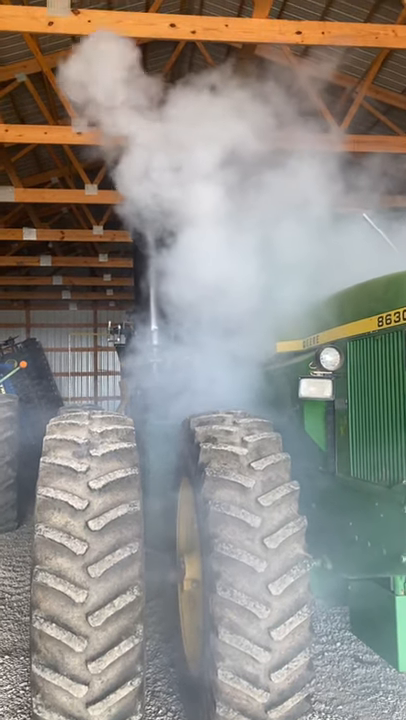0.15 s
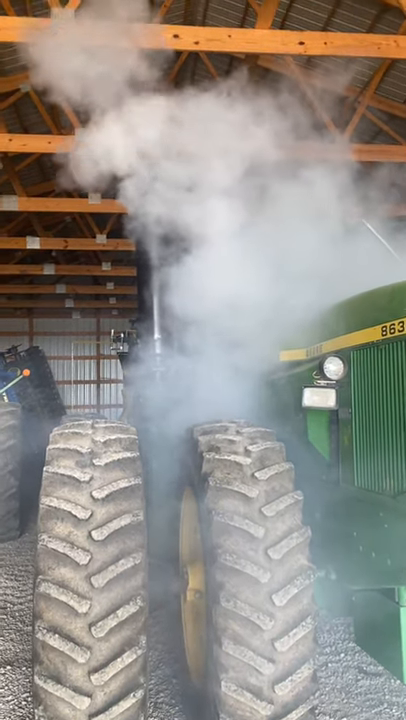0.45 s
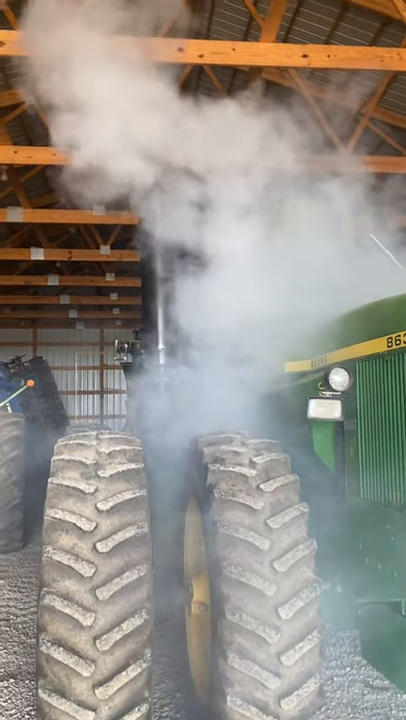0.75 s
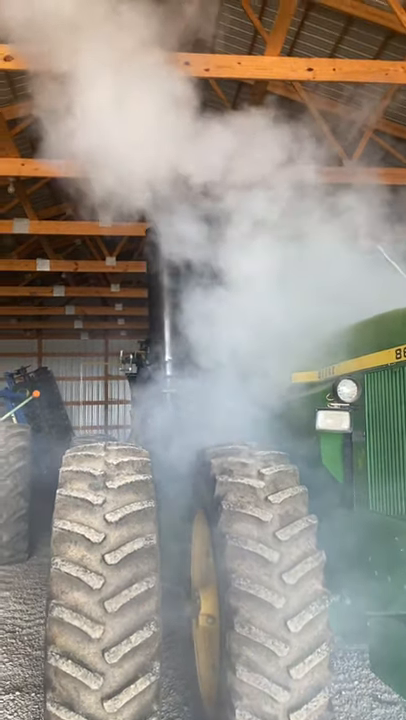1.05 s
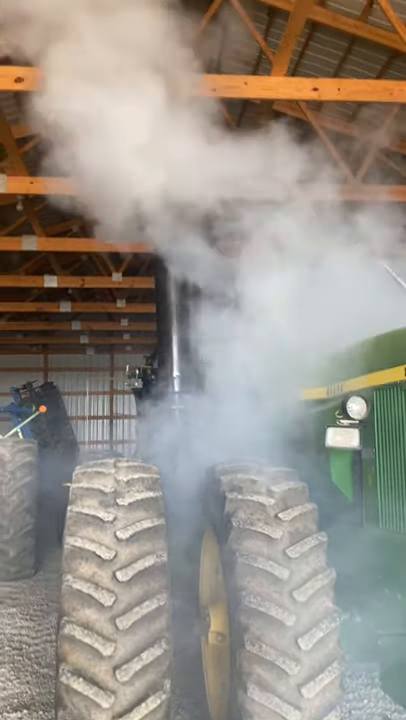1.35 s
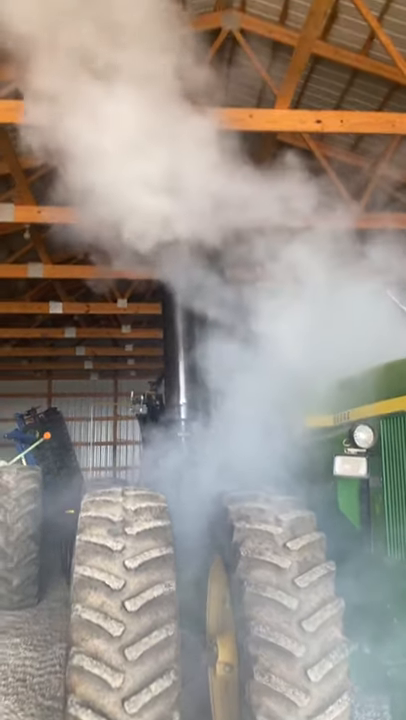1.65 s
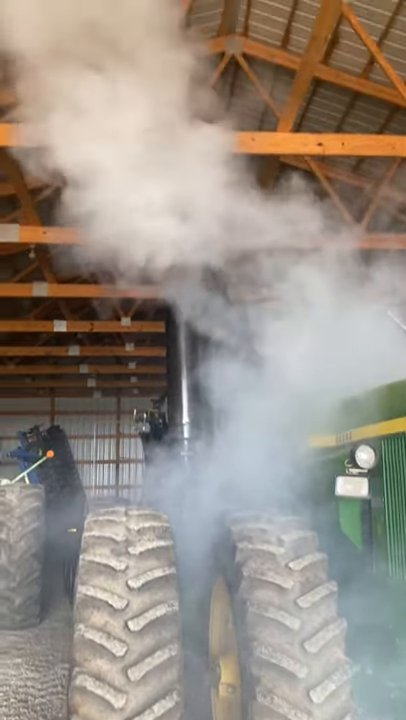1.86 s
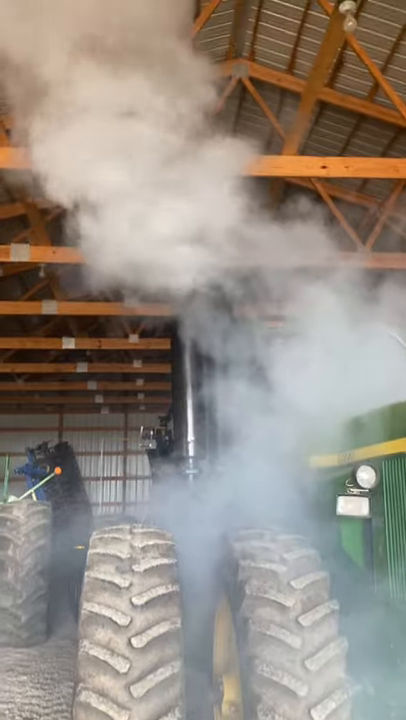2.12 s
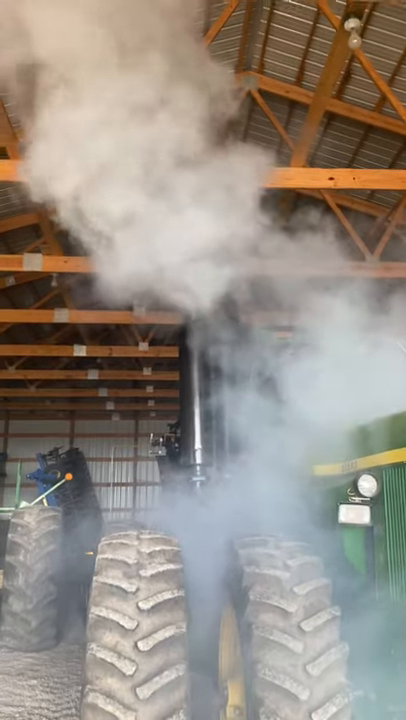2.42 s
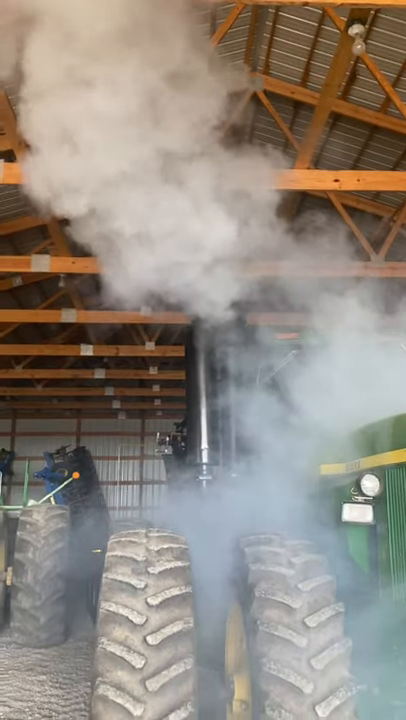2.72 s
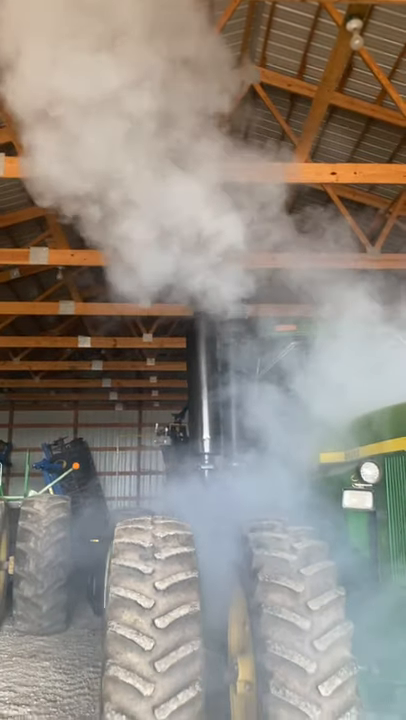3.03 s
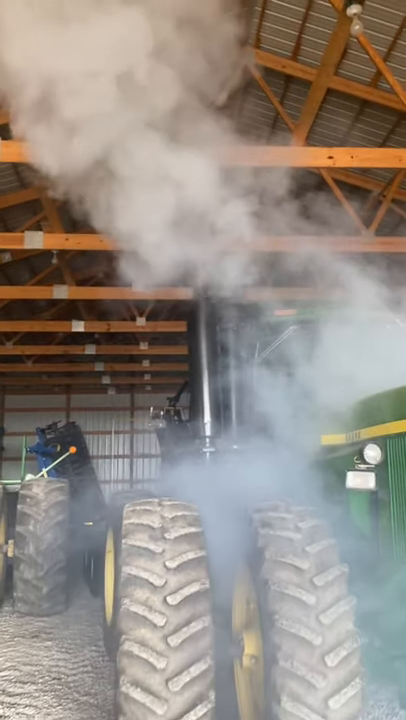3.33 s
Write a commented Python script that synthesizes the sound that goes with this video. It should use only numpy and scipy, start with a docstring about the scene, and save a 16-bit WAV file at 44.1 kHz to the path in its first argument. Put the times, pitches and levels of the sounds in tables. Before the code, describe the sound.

Large diesel engine chugging unevenly with hard uneven knocks and low rumble inside a shed.

```python
"""Ragged diesel tractor in a shed

A cold six-cylinder engine runs unevenly and slowly gathers speed. Its stack booms, throbs and rumbles:
engine orders, short low pressure swings, and noise and puffs shaped by resonances at each firing.
About once a cycle a cylinder bangs, as enveloped noise and wavering tones; gritty noise spits between.
Resonant noise makes the clatter and the loose steel, and decaying noise makes the shed's answer.
Towards the end the banging weakens and the running grows deeper and smoother."""
import sys
import numpy as np
from scipy import signal
from scipy.fft import rfft, irfft, next_fast_len
from scipy.io import wavfile
from scipy.ndimage import uniform_filter1d, map_coordinates

SR = 44100
rng = np.random.default_rng(int(sys.argv[2]) if len(sys.argv) > 2 else 0)


def dump_mix(stems):
    """Bounce the given channels to the path in sys.argv[1] as a 16-bit WAV at rate SR."""
    frames = np.atleast_2d(stems).T  # one column per channel
    limited = np.clip(frames, -1, 1)  # hard clip at full scale
    pcm = np.round(limited * 32767).astype(np.int16)
    wavfile.write(sys.argv[1], SR, pcm)


N = 153468  # samples
CYLINDERS = 6  # each fires once per engine cycle
COMMON = np.array([[1], [0]])  # sends a signal to the mid channel only


# Level of the stack before trims: t/s, boom level/dB, rumble level/dB
STACK_LEVELS = [(0, -25, -19), (.3, -27, -22), (.9, -24.5, -21), (1.5, -27, -21), (1.7, -28.5, -25),
                (2.3, -26.5, -24.5), (2.55, -28.5, -26.5), (2.63, -19.5, -23), (2.85, -24, -23),
                (3.0, -22, -23), (3.2, -23, -26), (3.48, -24.5, -28.5)]
# Levels before trims: t/s, gas roar level/dB, clatter level/dB, hiss level/dB
ENGINE_LEVELS = [(0.0, -45, -29, -13.5), (0.13, -19, -20, -52), (0.37, -20, -27, -50),
                 (0.61, -24.5, -27.5, -58), (1.38, -22.5, -28.5, -58), (1.78, -24.5, -32, -46),
                 (2.5, -25.5, -30.5, -61), (2.81, -24, -26.5, -58), (2.98, -23.5, -31.5, -26.5),
                 (3.2, -25.5, -32, -41), (3.48, -27, -32.5, -33)]
# Spectrum of the churning rumble: f/Hz, level/dB
RUMBLE_SPECTRUM = [(20, -25), (35, -32), (70, -37), (95, -2.5), (130, 3.5), (175, 0), (222, -6.5),
                   (260, -1), (295, -3.5), (325, -2), (360, -12), (400, -4.5), (500, -11), (700, -16),
                   (1500, -56), (5000, -84)]
# Spectrum of the gas roar: f/Hz, level/dB
ROAR_SPECTRUM = [(250, -12), (480, -1), (620, 2), (800, 4), (1020, -2.5), (1200, -6.5), (1450, -6.5),
                 (1700, -10), (2100, -11.5), (3500, -31), (9000, -91)]
# Resonances of stack and muffler: f/Hz, width/Hz, relative level/dB
STACK_MODES = [(132, 9.2, 6), (224.6, 34, 5.5), (247, 32, 0.5), (331, 87, -2.5), (399.3, 13.3, 2.5),
               (581, 5.3, -0.5)]


def exhaust(turns):
    """Pulsed excitation of a resonant pipe: firings modulate rumble and roar, and push puffs of gas."""
    rumble_db = curves(STACK_LEVELS)[1]
    roar_db = curves(ENGINE_LEVELS)[0]
    pipe = steady(noise(RUMBLE_SPECTRUM) + amp(-10) * ringing(STACK_MODES, drift=.03), size=900)
    churn = unit(pipe * firings(turns, uneven_db=3.5, scatter_s=0.00062, rise_s=0.014, fall_s=0.011))
    puffing = resonate(puffs(turns, uneven_db=2, scatter_s=.0012), STACK_MODES)
    rumble = unit(churn + amp(-4.5) * puffing)
    roar_pulses = firings(turns, uneven_db=1.4, scatter_s=0.0017, rise_s=0.0036, fall_s=0.023)
    roar = unit(noise(ROAR_SPECTRUM) * roar_pulses)
    return shed(amp(rumble_db - 1.0) * rumble + amp(roar_db - 3.0) * roar, wet_db=-7.5)


# Engine orders of the boom: multiple of the cycle rate, mean relative level/dB
BOOM_ORDERS = [(4, -48), (5, -12), (6, -17), (7, -13), (8, -25), (9, -14), (10, -27)]


def boom(turns, unsteady_db, drift_rad):
    """Superposition of engine orders: harmonics of the cycle rate beat together in the stack."""
    lines = np.zeros(N)
    for order, db in BOOM_ORDERS:
        level = amp(db + unsteady_db * wobble(12.0))
        phase = 2 * np.pi * (order * turns + rng.random()) + drift_rad * wobble(7)
        lines += level * np.sin(phase)
    return amp(curves(STACK_LEVELS)[0] - 2.5) * unit(lines) * COMMON


# Late, hard firings before trims: t/s, bang level/dB, metallic clack level/dB, hold/s
BANGS = [(0.006, -19.5, -21, 0.025), (0.174, -18.5, -20, 0.023), (.311, -9, -37, 0.0041),
         (0.44, -16, -22.5, 0.014), (0.561, -13, -24, 0.013), (0.692, -19, -21, 0.007),
         (0.806, -14.5, -23.5, 0.011), (0.93, -13, -23, 0.0077), (1.044, -9.5, -24, 0.0076),
         (1.17, -25, -19, 0.0032), (1.282, -8.5, -21, 0.01), (1.399, -14.5, -23.5, 0.026),
         (1.511, -10, -21, 0.015), (1.641, -25.5, -22.5, 0.006), (1.744, -13, -24, 0.011),
         (1.853, -16, -28.5, 0.026), (1.971, -12.5, -24, 0.013), (2.09, -21, -25.5, 0.0052),
         (2.196, -16.5, -35, 0.016), (2.302, -15.5, -35, 0.024), (2.414, -10.5, -26, 0.011),
         (2.532, -24.5, -31, 0.0047), (2.631, -16, -28, 0.011), (2.726, -19.5, -45, 0.015),
         (2.754, -15.5, -44, 0.017), (2.807, -16, -35, 0.022), (2.892, -21.5, -30, 0.013),
         (3.004, -20, -44, 0.0035), (3.063, -33, -31, 0.0051)]
# Spectrum of the gas in a bang: f/Hz, level/dB
BANG_SPECTRUM = [(80, -24), (220, 2), (450, 2.5), (650, -2), (850, 6.5), (1020, 7), (1220, -7.5),
                 (1450, -5), (1850, -5), (2200, -23), (3200, -20), (6000, -28), (15000, -90)]
# Spectrum of the metallic clack: f/Hz, level/dB
CLACK_SPECTRUM = [(500, 11), (1200, -16), (1700, 7), (1900, 19), (2080, 9.5), (2300, 10), (2520, 12),
                  (2800, 8.5), (3040, 9.5), (3500, -5.5), (4300, 2.5), (6000, -15), (10000, -62),
                  (15000, -117)]
# Resonances that sing in a bang: f/Hz, width/Hz, mean relative level/dB
BARK_MODES = [(626.6, 25.8, -4), (795.4, 49, -0.5), (985, 40, -1), (1173, 70, -7), (1662, 100, -7),
              (2534, 50.4, -16)]
# Resonances of the engine block: f/Hz, width/Hz, relative level/dB
IRON_MODES = [(1742, 24, -7), (2144, 69, 1), (2473, 47, 7.5), (2960, 8.4, 5), (3096, 22, 3)]


def bangs():
    """Impulsive excitation: a late firing cracks, swells to a bark in the stack and clacks in the block."""
    s, bang_db, clack_db, hold_s = np.transpose(BANGS)
    gas = steady(noise(BANG_SPECTRUM) + amp(1) * singing(BARK_MODES), size=110)
    swell = bursts(s + 0.0017, bang_db - .8, rise_s=0.0063, fall_s=0.011, hold_s=hold_s)
    crack = bursts(s - .005, bang_db - 6.5, rise_s=.0007, fall_s=.004)
    iron = steady(noise(CLACK_SPECTRUM) + amp(-5.5) * ringing(IRON_MODES, drift=.02), size=200)
    clack = iron * bursts(s, clack_db - .5, rise_s=0.0076, fall_s=0.013, hold_s=hold_s)
    return shed(gas * np.hypot(swell, crack) + clack, wet_db=-10.5)


# Thuds that close hard firings, before the shed's answer: t/s, peak level/dB
THUDS = [(.193, -16), (0.255, -10), (.308, -6), (.463, -8), (.581, -8.5), (.692, -15.5), (0.824, -4),
         (1.062, -6.5), (1.3, -6.5), (1.534, -9), (1.764, -9), (2.216, -10.5), (2.435, -11), (2.651, -13),
         (2.833, -10.5)]
# Deep throbs of the stack, before the trim: t/s, peak level/dB, f/Hz
THROBS = [(0.17, -19.8, 53), (0.311, -19.8, 53), (0.391, -20.5, 56), (0.525, -22.4, 54), (0.647, -19.2, 53),
          (0.756, -17.2, 60), (0.884, -18.6, 53), (0.999, -21.9, 52), (1.122, -18.2, 54),
          (1.242, -16.8, 60), (1.358, -18.0, 57), (1.484, -20.9, 60), (1.592, -21.2, 57),
          (1.715, -21.7, 57), (1.827, -20.4, 59), (1.933, -23.3, 55), (2.051, -21.3, 59),
          (2.163, -21.1, 57), (2.276, -20.4, 57), (2.378, -21.9, 54), (2.551, -20.1, 58),
          (2.631, -15.3, 57), (2.796, -14.7, 65), (2.902, -15.3, 65), (3.065, -17.4, 59),
          (3.193, -18.4, 63), (3.276, -21.7, 56), (3.382, -19.7, 65)]


def thumps():
    """Gaussian-windowed pressure swings: thuds close hard bangs, and throbs come about once a cycle."""
    thuds = pushes(*np.transpose(THUDS), 229, half_s=0.0033)
    throbs = pushes(*np.transpose(THROBS), half_s=.033)
    return shed(thuds, wet_db=-3.5) + amp(-2.5) * throbs


# Spits of gas before the trim: t/s, level/dB
SPITS = [(0.088, -33.5), (0.241, -37), (0.363, -40.5), (0.487, -39), (0.613, -40), (0.735, -34.5),
         (0.858, -36.5), (0.974, -35.5), (1.094, -38.5), (1.213, -32.5), (1.333, -34.5), (1.449, -34),
         (1.569, -40.5), (1.681, -34), (1.796, -37), (1.908, -36.5), (1.966, -50), (2.021, -38),
         (2.132, -33), (2.245, -36), (2.352, -35.5), (2.413, -52), (2.465, -36.5), (2.576, -31.5),
         (2.612, -33), (2.675, -35), (2.767, -32.5), (2.852, -35.5), (2.882, -34), (2.934, -39.5),
         (3.039, -38.5), (3.194, -40)]
# Spectrum of escaping gas: f/Hz, level/dB
SPIT_SPECTRUM = [(1500, 4), (3500, 5), (4600, 8), (5700, 7.5), (6700, 5), (7300, -5.5), (8800, 3),
                 (10700, -7), (12000, 0), (13500, -4), (14500, -37), (15500, -38)]
# Resonances of thin metal: f/Hz, width/Hz, relative level/dB
TIN_MODES = [(4740, 120, -5), (5660, 250, -9), (10400, 500, 15)]


def spits():
    """Turbulent jet noise: short gritty escapes of gas ring thin metal and linger under the roof."""
    s, db = np.transpose(SPITS)
    impacts = ticks(per_s=970, spread_db=1)
    grit = unit(filtered(impacts, lambda hz: amp(along(SPIT_SPECTRUM, hz))))
    gas = unit(noise(SPIT_SPECTRUM) + amp(-4) * grit + amp(-10) * ringing(TIN_MODES, drift=0.045))
    envelope = bursts(s, db + 6.5, rise_s=0.0058, fall_s=0.018, hold_s=0.0085)
    return shed(gas * envelope, wet_db=-6.5)


# Spectrum of the diesel clatter: f/Hz, level/dB
CLATTER_SPECTRUM = [(700, 0.5), (1600, -16), (2080, 4.5), (2270, 1.5), (2520, 8.5), (2800, 4), (3060, 6),
                    (3500, 2), (4300, -2.5), (5500, -8.5), (7000, -26), (9000, -42), (12000, -50),
                    (15000, -70)]
# Resonances of small rattling parts: f/Hz, width/Hz, relative level/dB
RATTLE_MODES = [(1370, 130, -1), (1870, 92, 4), (2170, 63, 8.5), (2950, 100, -8), (4330, 130, -14)]
# Resonances of loose steel: f/Hz, width/Hz, relative level/dB
STEEL_MODES = [(4300, 200, 3.5), (4720, 320, -8), (5400, 410, -13)]


def block(turns):
    """Modal response to firing: clatter rings iron and loose steel, among small rattles and a thin hiss."""
    _, clatter_db, hiss_db = curves(ENGINE_LEVELS)
    metal = noise(CLATTER_SPECTRUM) + amp(-13) * ringing(IRON_MODES, drift=.006)
    metal = metal + amp(-14.5) * ringing(STEEL_MODES)
    clatter = unit(metal * firings(turns, uneven_db=2.3, scatter_s=0.0013, rise_s=0.0087, fall_s=0.019))
    rattle = resonate(ticks(per_s=110, spread_db=4), RATTLE_MODES)
    mechanical = amp(clatter_db - 8.0) * (clatter + amp(-7) * rattle)
    hiss = amp(hiss_db - 13.0) * noise(SPIT_SPECTRUM)
    return shed(mechanical + hiss, wet_db=-5.5)


# Buzzes of the loose steel before the trim: t/s, level/dB
STEEL_BUZZES = [(1.966, -23), (2.190, -31.5), (2.306, -32), (2.412, -28.5), (2.615, -27), (2.735, -38),
                (2.888, -27)]


def loose_steel():
    """Forced modal vibration: a loose part, shaken by the engine, buzzes briefly at its resonances."""
    s, db = np.transpose(STEEL_BUZZES)
    buzz = ringing(STEEL_MODES) * bursts(s, db - 0.5, rise_s=0.0034, fall_s=0.027, hold_s=0.0022)
    return shed(buzz, wet_db=-13)


# Reverberation time of the shed: f/Hz, t60/s
SHED_T60 = [(100, 0.69), (1000, 0.67), (5000, 0.69), (12000, 0.36)]


def shed(x, wet_db):
    """Diffuse reverberation: noise builds up and decays at each frequency's own t60."""
    hz, t, z = signal.stft(rng.standard_normal((2, SR // 2)), SR, nperseg=256)
    decay = amp(-60 * t / along(SHED_T60, hz)[:, None])
    build_up = 1 - np.exp(-t / 0.029)
    tail = signal.istft(z * decay * build_up, SR, nperseg=256)[1]
    tail = tail / np.linalg.norm(tail[0])
    return x + amp(wet_db) * signal.fftconvolve(x, tail, axes=1)[:, :N]


def firing_samples(turns):
    """Equal phase spacing: sample indices at which the cycle passes each cylinder's firing point."""
    return np.flatnonzero(np.diff(np.floor(turns * CYLINDERS)))


def firings(turns, uneven_db, scatter_s, rise_s, fall_s):
    """Amplitude modulation: one burst per firing, each of its own size and a little early or late."""
    times = firing_samples(turns) / SR
    chance = rng.standard_normal((len(times), 2))
    return unit(bursts(times + scatter_s * chance[:, 0], uneven_db * chance[:, 1], rise_s, fall_s))


def puffs(turns, uneven_db, scatter_s):
    """Volume-flow pulses: one impulse per firing, softened by a third-order low-pass at 900 Hz."""
    i = firing_samples(turns)
    chance = rng.standard_normal((len(i), 2))
    at = np.clip(i + scatter_s * SR * chance[:, 0], 0, N - 1).astype(int)
    push = np.bincount(at, amp(uneven_db * chance[:, 1]), N)
    return filtered(push, lambda hz: 1 / (1 + 1j * hz / 900) ** 3) * COMMON


def pushes(times, levels_db, pitches_hz, half_s):
    """Gaussian tone bursts: low pressure swings centred on their times, 1/e half-width half_s."""
    out = np.zeros(N)
    for s, db, hz in np.broadcast(times, levels_db, pitches_hz):
        i = np.arange(max(0, int((s - 3 * half_s) * SR)), min(N, int((s + 3 * half_s) * SR)))
        t = i / SR - s
        out[i] -= amp(db) * np.exp(-(t / half_s) ** 2) * np.cos(2 * np.pi * hz * t)
    return out * COMMON


def bursts(times, levels_db, rise_s, fall_s, hold_s=0):
    """Incoherent power addition: bursts with a Gaussian rise, a hold and an exponential fall."""
    power = np.zeros(N)
    for s, db, hold in np.broadcast(times, levels_db, hold_s):
        first = max(0, int((s - 4 * rise_s) * SR))
        i = np.arange(first, min(N, int((s + hold + 8 * fall_s) * SR)))
        t = i / SR - s
        exponent = np.where(t < 0, -(t / rise_s) ** 2, -np.maximum(t - hold, 0) / fall_s)
        power[i] += (amp(db) * np.exp(exponent)) ** 2
    return np.sqrt(power)


def ticks(per_s, spread_db):
    """Poisson-like impacts: shared random times and sizes, with a separate random sign per channel."""
    hits = (rng.random(N) < per_s / SR) * amp(spread_db * rng.uniform(-1, 1, N))
    return hits * np.sign(rng.standard_normal((2, N)))


def resonate(x, modes):
    """Modal superposition: x through parallel second-order resonances, at rms 1."""
    def response(f):
        return sum(amp(db) * 1j * f * width / (centre * centre - f * f + 1j * f * width)
                   for centre, width, db in modes)
    return unit(filtered(x, response))


def ringing(modes, drift=0):
    """Noise-driven resonance: two unrelated noises whose pitch drifts by about this fraction, rms 1."""
    x = resonate(rng.standard_normal((2, N)), modes)
    i = np.arange(N)
    warped = (i + np.cumsum(drift * wobble(9))) % N  # varying the reading speed bends the pitch
    return unit(np.array([np.interp(warped, i, channel) for channel in x]))


def singing(modes):
    """Frequency-modulated resonance: strong tones waver within their width and shift together, rms 1."""
    shift = 1 + .035 * wobble(9)  # knots come at about the cycle rate

    def tone(hz, width):
        pitch = hz * shift + width * wobble(110)
        return np.sin(2 * np.pi * (np.cumsum(pitch) / SR + rng.random()))

    def voice():
        return sum(amp(db + 2.5 * wobble(9)) * tone(hz, width) for hz, width, db in modes)
    return unit(np.array([voice() for channel in range(2)]))


def steady(x, size):
    """Envelope normalisation: evens out the swells of a noise over size samples."""
    power = uniform_filter1d(uniform_filter1d(x ** 2, size), size)
    return x / np.sqrt(np.abs(power) + 1e-9)


def noise(spectrum):
    """Spectral shaping: two unrelated noises of rms 1 with this spectrum."""
    return unit(filtered(rng.standard_normal((2, N)), lambda hz: amp(along(spectrum, hz))))


def filtered(x, response):
    """Linear filtering: multiplies the spectrum of x by a response of frequency."""
    m = next_fast_len(N + SR // 2)
    return irfft(rfft(x, m) * response(np.fft.rfftfreq(m, 1 / SR)), m)[..., :N]


def wobble(rate):
    """Band-limited fluctuation: a smooth random curve, rate knots a second."""
    return map_coordinates(rng.standard_normal(int(N * rate / SR) + 4), [np.arange(N) * rate / SR])


def curves(rows):
    """Linear interpolation in time: one value per sample for each column after t/s."""
    s, *cols = np.transpose(rows)
    return [np.interp(np.arange(N) / SR, s, c) for c in cols]


def along(points, hz):
    """Logarithmic frequency scale: interpolates (f/Hz, value) points."""
    f, v = np.transpose(points)
    return np.interp(np.log(hz + 1), np.log(f + 1), v)


def amp(db):
    """Level law: decibels to amplitude gain."""
    return 10 ** (np.asarray(db) / 20)


def unit(x):
    """Power normalisation: scales to rms 1."""
    return x / np.sqrt(np.mean(x ** 2) + 1e-20)


# Speed of the engine: t/s, cycle rate f/Hz
SPEED = [(0, 7.7), (.75, 8.2), (1.25, 8.5), (1.75, 8.8), (2.25, 9.0), (2.75, 9.1), (3.48, 9.2)]
# Likeness of the two ports: f/Hz, correlation of left and right [1 = alike]
ALIKE = [(100, 1), (250, .995), (600, .96), (1200, .87), (1800, .93), (2400, .72), (3200, .42), (4700, .45),
         (6000, .8), (7200, .98), (8800, .72), (10200, .98), (11800, .65), (13300, .97), (15000, .6)]
# Phase between the ports: f/Hz, lead of the left port/rad
LEAD = [(0, 0), (400, -.05), (750, -.3), (1200, -.1), (1900, 0), (2700, .5), (3600, 1.3), (4500, 1.3),
        (4900, .4), (6000, 1.6), (7000, 3.1), (7800, 3.2), (9700, 6.25), (11500, 6.4), (12900, 9.3),
        (14400, 9.5), (15500, 12.5)]
# Balance of the ports: f/Hz, left minus right level/dB
TILT = [(120, 0), (250, -.6), (600, .3), (1000, -.9), (2000, -1.2), (3100, -2.8), (4300, .3), (15000, 0)]


def scene():
    """Spatial coherence: a close pair of microphone ports, alike in the bass and less so in the treble."""
    turns = np.cumsum(curves(SPEED)[0]) / SR
    pair = boom(turns, unsteady_db=1.0, drift_rad=0.94) + exhaust(turns) + block(turns)
    pair = pair + bangs() + spits() + thumps() + loose_steel()

    def mid_side(hz):
        angle = np.arccos(np.clip(along(ALIKE, hz), -1, 1)) / 2
        return np.array([np.cos(angle), np.sin(angle)])

    def ports(hz):
        level, lead = along(TILT, hz), along(LEAD, hz)
        return np.array([amp(sign * level / 2) * np.exp(sign * .5j * lead) for sign in (1, -1)])

    mid, side = filtered(pair, mid_side)
    return filtered(np.array([mid + side, mid - side]), ports)


def record(dry):
    """Band limitation and saturation: 27 Hz high-pass, rounded peaks, and nothing kept above 15830 Hz."""
    cut = filtered(dry, lambda hz: 1 / np.sqrt(1 + (27 / (hz + 1)) ** 6))
    held = cut / (1 + np.abs(cut / .97) ** 6) ** (1 / 6)
    return filtered(held, lambda hz: hz < 15830)


dry = scene()
out = record(dry)
dump_mix(out)
```